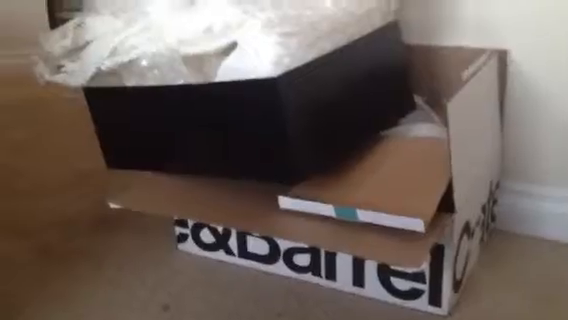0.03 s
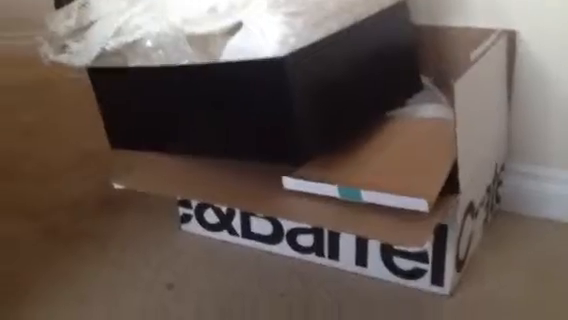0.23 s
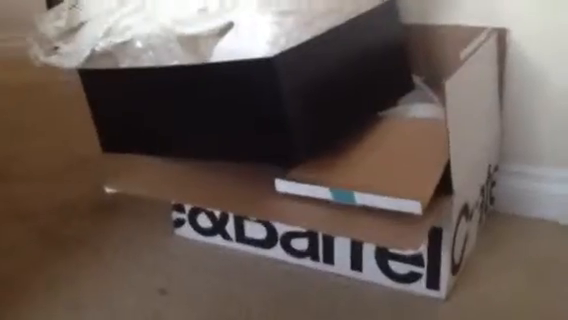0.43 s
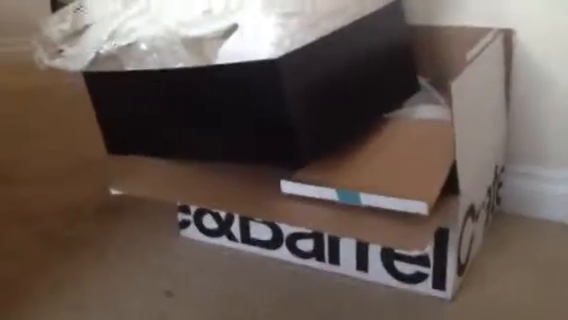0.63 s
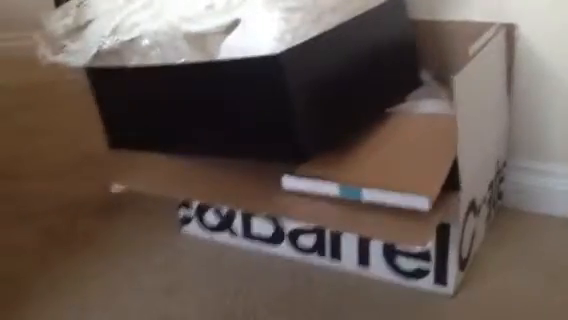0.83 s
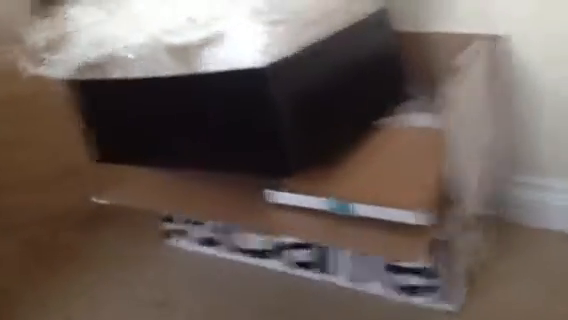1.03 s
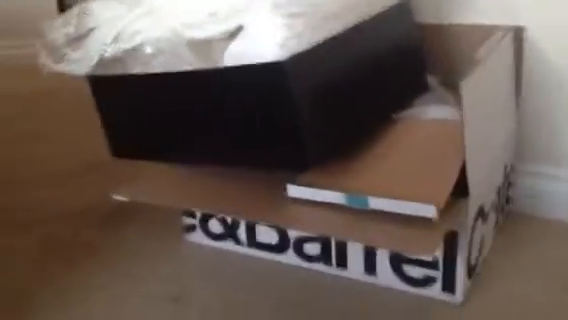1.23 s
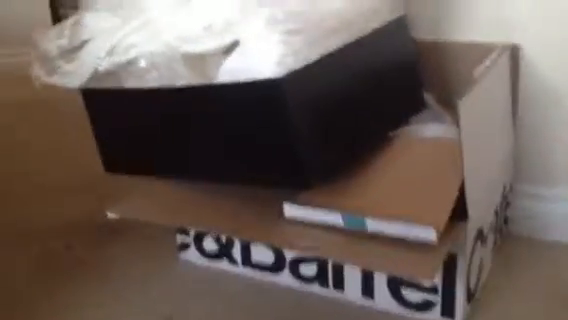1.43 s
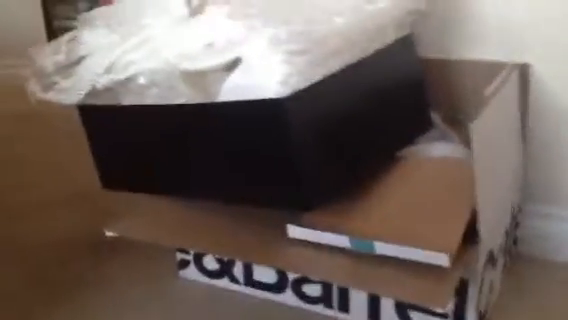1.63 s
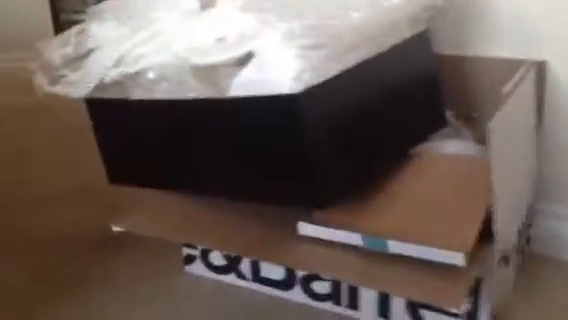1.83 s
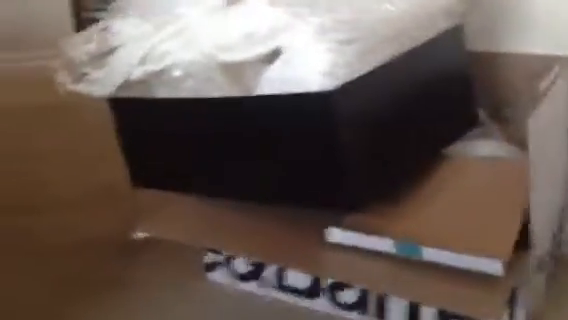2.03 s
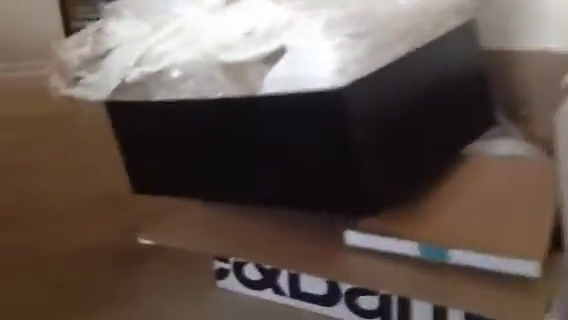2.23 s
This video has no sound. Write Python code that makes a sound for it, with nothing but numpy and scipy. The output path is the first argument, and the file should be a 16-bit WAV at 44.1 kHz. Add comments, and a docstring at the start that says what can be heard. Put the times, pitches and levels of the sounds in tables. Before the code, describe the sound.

A cat gives one short, closed-mouth trill, low at first and leaping up at the end. Small ticks and a faint rustle come just before and after it, in a small room with steady low hum and microphone hiss.

```python
"""Steady room noise, a low hum and microphone hiss come first and lie under everything.
A few small ticks and a rustle lead into one short closed-mouth trill from a cat. A flutter in its
throat chops the voice into twelve bursts, about 25 a second, low and level at first, then leaping
an octave at the end. Two more ticks and a fainter rustle follow. The small room adds a short echo."""
import sys
import numpy as np
from scipy import signal
from scipy.fft import rfft, irfft, next_fast_len
from scipy.io import wavfile
from scipy.ndimage import map_coordinates

SR = 44100
rng = np.random.default_rng(int(sys.argv[2]) if len(sys.argv) > 2 else 0)


def generate_wav(sig):
    """Save sig (samples, or channels by samples) to the path in sys.argv[1] as 16-bit PCM at SR."""
    pcm = np.round(np.clip(np.atleast_2d(sig).T, -1, 1) * 32767).astype(np.int16)
    wavfile.write(sys.argv[1], SR, pcm)


N = 101429


def amp(db):
    """Turn decibels into a number to multiply a sound by."""
    return 10 ** (np.asarray(db) / 20)


def unit(x):
    """Scale a sound so that its average power is 1."""
    return x / np.sqrt(np.mean(x ** 2) + 1e-20)


def along(points, hz):
    """Read between the rows of a (frequency, value) table, on a scale of octaves."""
    freqs, values = np.transpose(points)
    return np.interp(np.log(hz + 1), np.log(freqs + 1), values)


def wobble(rate, size):
    """A smooth curve through `rate` random values a second."""
    return map_coordinates(rng.standard_normal(2048), [np.arange(size) * rate / SR], mode="mirror")


def filtered(x, response):
    """Turn each frequency of a sound up or down by response(frequency)."""
    size = next_fast_len(x.shape[-1] + 8192)
    return irfft(rfft(x, size) * response(np.fft.rfftfreq(size, 1 / SR)), size)[..., :x.shape[-1]]


def noise(tone, size):
    """Steady noise, shaped by a tone table of (frequency, level) rows."""
    return unit(filtered(rng.standard_normal(size), lambda hz: amp(along(tone, hz))))


def fade(t, fade_s):
    """Die away from 1, dropping 60 dB in the fade time."""
    return np.exp(-np.log(1000) * t / fade_s)


def puff(tone, t, fade_s):
    """A short puff of noise, shaped by a tone table."""
    white = rng.standard_normal(len(t)) * fade(t, fade_s)
    return filtered(np.pad(white, (SR // 1000, 0)), lambda hz: unit(amp(along(tone, hz))))


def gate(t, length, rise, fall):
    """Rise smoothly to 1, hold, then fall back to 0."""
    opening = np.sin(np.pi / 2 * np.clip(t / rise, 0, 1))
    closing = np.sin(np.pi / 2 * np.clip((length - t) / fall, 0, 1))
    return opening * closing


def add(track, start, sound):
    """Mix a sound into the track, `start` seconds in."""
    part = track[round(start * SR):][:len(sound)]
    part += sound[:len(part)]


# Tone of the room noise and hiss (frequency [Hz], relative level [dB])
BACKGROUND_TONE = [(25, -55), (50, -30.5), (80, -20), (105, -5.5), (145, -19.5), (175, -8), (210, -12),
                   (255, -3.5), (350, -9.5), (560, -12), (800, -9.5), (1150, -9), (1700, -17.5),
                   (3050, -31), (5000, -35), (7000, -37), (9900, -45.5), (12500, -37.5), (15200, -36.5)]

def background(hum_hz=117, drift_hz=2, waver_db=1.8, hum_db=-68, noise_db=-57.5):
    """Steady room noise with microphone hiss, and a wavering low hum."""
    phase = 2 * np.pi * np.cumsum(hum_hz + drift_hz * wobble(4.2, N)) / SR
    hum = unit(np.sin(phase) * amp(waver_db * wobble(8.5, N)))
    return amp(noise_db) * noise(BACKGROUND_TONE, N) + amp(hum_db) * hum


# Small ticks (time [s], ring level [dB], ring pitch [Hz], ring fade time [s], snap level [dB])
TICK_EVENTS = [(0.1247, -34.5, 431, 0.03, -32), (.145, -58, 2400, 0.016, -42.5),
               (0.149, -32.5, 289, 0.012, -57), (0.16, -38, 1890, 0.026, -54),
               (.172, -36, 493, 0.023, -50.5), (0.1866, -25, 380, 0.019, -45.5),
               (0.1942, -30.5, 1080, 0.017, -58.5), (0.675, -36, 900, .015, -60),
               (0.974, -39, 463, 0.015, -88)]
# Tone of a tick's snap (frequency [Hz], relative level [dB])
SNAP_TONE = [(100, -38), (300, -10), (900, -0.5), (1500, -1.5), (2300, 7), (2900, -9.5), (3800, -7),
             (5200, -17), (6000, -33), (7500, -35), (12000, -43.5)]

def ticks(rise_s=0.00033):
    """Each tick is a bright snap of noise and one short ringing note."""
    out, t = np.zeros(N), np.arange(SR // 10) / SR
    for start, ring_db, hz, fade_s, snap_db in TICK_EVENTS:
        ring = fade(t, fade_s) * (1 - np.exp(-t / rise_s)) * np.sin(2 * np.pi * hz * t)
        snap = puff(SNAP_TONE, t, fade_s=.012)[:len(t)]
        add(out, start, amp(ring_db) * ring + amp(snap_db) * snap)
    return out


# Faint rustles around the call (time [s], length [s], level [dB])
RUSTLE_EVENTS = [(0.134, 0.097, -57.5), (0.681, 0.107, -63.5)]
# Tone of a rustle (frequency [Hz], relative level [dB])
RUSTLE_TONE = [(300, -16), (1000, 5.5), (1900, -5), (2550, -4), (3100, -18), (3700, -10), (4600, -22.5),
               (5500, -28.5), (7500, -24), (10000, -41.5)]

def rustles(grain_db=-0.5):
    """Soft, slightly grainy noise that swells and fades."""
    out, t = np.zeros(N), np.arange(SR // 4) / SR
    for start, length, db in RUSTLE_EVENTS:
        grainy = unit(amp(grain_db * wobble(230, len(t))) * noise(RUSTLE_TONE, len(t)))
        add(out, start, amp(db) * gate(t, length, rise=.017, fall=.017) * grainy)
    return out


# Bursts of the trill (time [s], length [s], mid-burst pitch [Hz], climb [octaves], level [dB],
# brightness [dB per octave], breath boost [dB], opening tick boost [dB], swell over the burst [dB])
TRILL_BURSTS = [(0.203, 0.022, 246, 0.1, -25, -5, -0.5, -4, 0.5),
                (.234, 0.029, 249.2, 0.065, -23.5, 0, 4, -4.5, 0),
                (0.275, 0.025, 244.3, 0.11, -22, -1.5, 6, -5, 4.5),
                (.310, .028, 232, 0.25, -24.5, -0.5, 4.5, -4.5, -3),
                (.348, 0.031, 235.7, 0.36, -23, -1.5, 3, -2, -2),
                (0.388, 0.028, 219.2, 0.39, -23.5, 0, 3, 2, 6),
                (0.431, .031, 220.2, 0.25, -23.5, 0, 2, -0.5, 5),
                (0.473, .030, 229, 0.33, -23.5, -1, 6, 1.5, -1),
                (0.517, 0.026, 245.3, 0, -22.5, 0.5, 3, 0, -1),
                (0.557, 0.031, 282.3, 0.42, -22, 1.5, 4, 3, -0.5),
                (.598, 0.024, 372.5, 0.22, -17.5, 3.5, -1, 4, 6.5),
                (.645, .023, 504, 0, -12.5, -3.5, -0.5, 0.5, -3.5)]
# Tones of the four parts of a burst (frequency [Hz], relative level [dB])
VOICE_TONE = [(200, 1), (480, -0.5), (720, -8.5), (990, -7), (1150, -22), (1400, -45.5), (1650, -14.5),
              (1870, -28), (2150, -54), (2650, -51), (3050, -49.5), (3900, -43.5), (4500, -51), (5100, -71)]  # the voice, shaped by throat and nose
MURMUR_TONE = [(220, 7), (450, -13), (750, -13.5), (1030, -1), (1300, -33), (2000, -49), (3000, -59.5)]  # the murmur heard through the nose
BREATH_TONE = [(100, -50), (200, -14.5), (450, 13.5), (750, -1.5), (1030, 12), (1300, -7), (1850, -3),
               (2600, -21.5), (4100, -29), (5200, -39.5), (7200, -37), (9500, -53.5), (13000, -40)]  # air swirling in the voice
OPENING_TONE = [(100, -46.5), (250, -21), (500, 19), (1300, 9), (2600, -24), (3800, -11), (4800, -27),
                (5500, -20), (6500, -38), (10000, -54.5)]  # the tick as the throat opens

def trill(low_hz=235, rise_s=.012, close_s=.008, murmur_s=.018, breath_edge_s=.0039):
    """The throat flutters: it opens with a tick, lets out a breathy voice, then closes to a murmur."""
    out, t = np.zeros(N), np.arange(SR // 10) / SR
    harmonic = np.arange(1, 23)[:, None]  # a voice is a stack of notes at 1, 2, 3... times its pitch
    for start, length, hz, climb, db, brightness, breath_db, tick_db, swell_db in TRILL_BURSTS:
        progress = np.minimum(t / length, 1)
        pitch = hz * 2 ** (climb * (progress ** .86 - .5 ** .86))  # climbs fastest at the start
        pitch *= 1 + .006 * wobble(220, len(t))  # slightly unsteady
        pitch *= 1 - .08 * np.clip((t - length) / close_s, 0, 1)  # sags after the burst
        phase = 2 * np.pi * np.cumsum(pitch) / SR
        waves = np.cos(harmonic * phase)

        balance_db = -7 * (harmonic > 2) + brightness * np.log2(harmonic)
        voice = np.sum(amp(along(VOICE_TONE, harmonic * pitch) + balance_db) * waves, axis=0)
        voice *= gate(t, length, rise_s * (low_hz / hz) ** .9, close_s)  # higher bursts start faster
        voice *= amp(.4 * wobble(200, len(t)))  # the level trembles
        voice *= amp(swell_db * (progress - .5))

        murmur_db = -13 - 17 * np.log2(hz / low_hz)  # fainter at high pitch
        murmur = np.sum(amp(along(MURMUR_TONE, harmonic * pitch) + murmur_db) * waves, axis=0)
        closed = np.clip((t - length) / close_s + 1, 0, 1)
        murmur *= closed * gate(t, length + murmur_s, rise_s, close_s)
        murmur *= fade(np.maximum(t - length, 0), fade_s=.12)

        breath = noise(BREATH_TONE, len(t)) * (1 + .37 * np.cos(phase))  # pulses with the voice
        breath *= gate(t, length + breath_edge_s, breath_edge_s, breath_edge_s)
        add(out, start, amp(db) * (voice + murmur) + amp(breath_db - 44.5) * breath)

        tick = amp(tick_db - 31.5) * puff(OPENING_TONE, t, fade_s=.016)
        add(out, start - .002 * hz / low_hz, tick)  # just ahead of the voice
    return out


# Echoes from near walls and boxes (delay [s], level [dB])
WALL_ECHOES = [(.0063, -25.5), (.0112, -22), (.0165, -28)]
# How long the room rings on (frequency [Hz], fade time [s])
TAIL_FADES = [(200, 0.31), (500, 0.36), (1000, 0.19), (3000, .4), (10000, 0.18)]
# Tone of that ringing tail (frequency [Hz], relative level [dB])
TAIL_TONE = [(200, 9), (380, 5), (500, 0), (750, -0.5), (1020, 6), (1500, 11.5), (2100, -5.5), (2600, 1),
             (3100, -7), (3700, 0.5), (5000, 4), (7500, 5)]

def room(sound, tail_db=-19.5):
    """Sound bounces off near walls, then blurs into a short tail of many echoes."""
    hz, t, bands = signal.stft(rng.standard_normal(SR // 2), SR, nperseg=256)
    bands *= fade(t, along(TAIL_FADES, hz)[:, None])
    tail = unit(signal.istft(bands, SR, nperseg=256)[1])
    tail = filtered(tail / np.sqrt(len(tail)), lambda f: amp(along(TAIL_TONE, f)))
    tail = np.pad(tail, (SR // 200, 0))  # arrives 5 ms late
    # each wall sends back a delayed, quieter copy
    echoes = filtered(sound, lambda f: sum(amp(db) * np.exp(-2j * np.pi * f * delay)
                                           for delay, db in WALL_ECHOES))
    return echoes + amp(tail_db) * signal.fftconvolve(sound, tail)[:N]


def scene(low_cut_hz=155):
    """Over the background, the ticks, rustles and cat sound in the room without their deep bass."""
    direct = filtered(ticks() + rustles() + trill(), lambda hz: 1 / (1 + (low_cut_hz / (hz + 1)) ** 6))
    return (background() + direct + room(direct))[None]


def record(dry):
    """Remove the very highest treble, from 15330 Hz up."""
    return filtered(dry, lambda hz: hz < 15330)


dry = scene()
out = record(dry)
generate_wav(out)
```